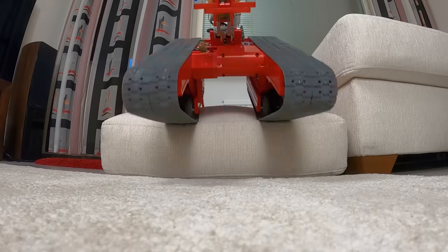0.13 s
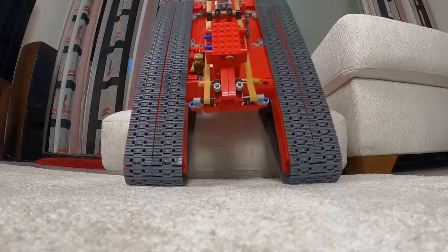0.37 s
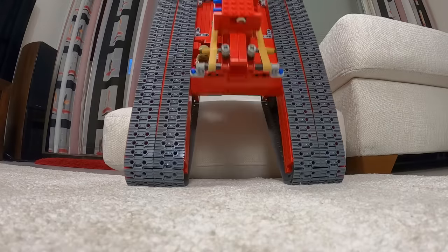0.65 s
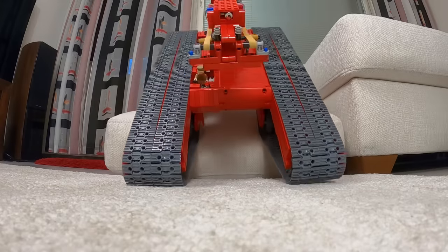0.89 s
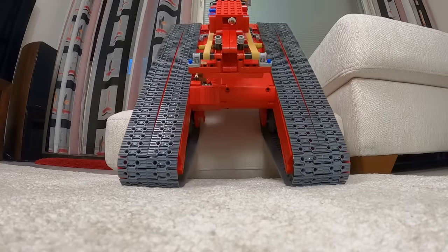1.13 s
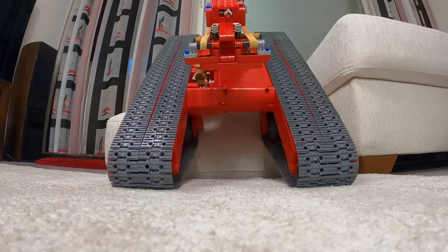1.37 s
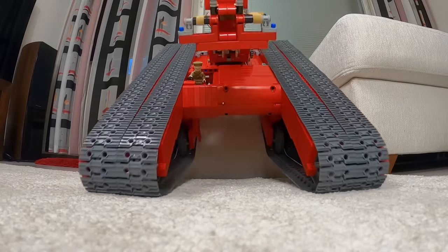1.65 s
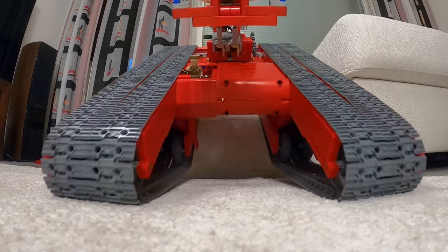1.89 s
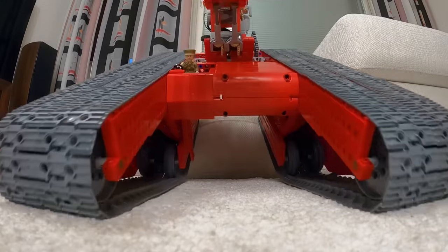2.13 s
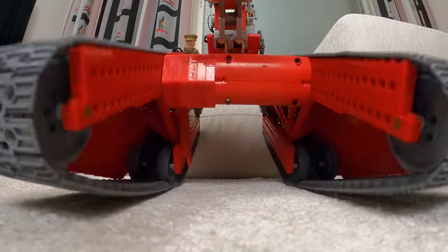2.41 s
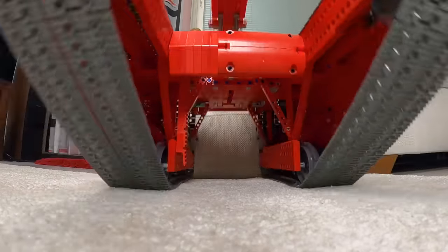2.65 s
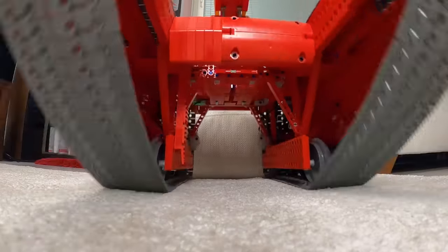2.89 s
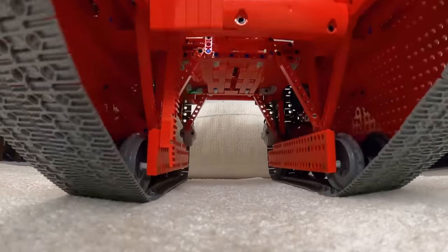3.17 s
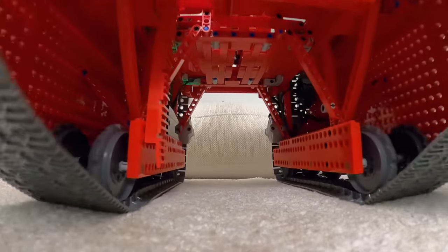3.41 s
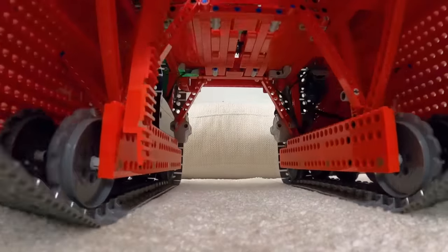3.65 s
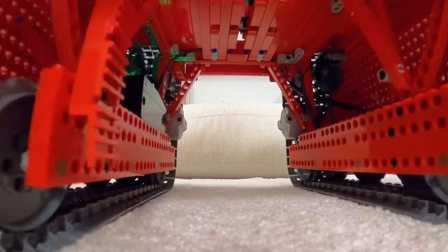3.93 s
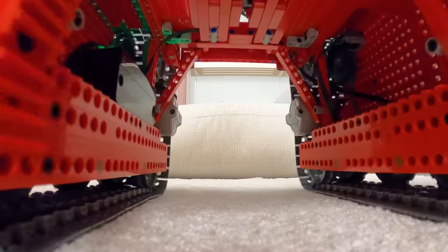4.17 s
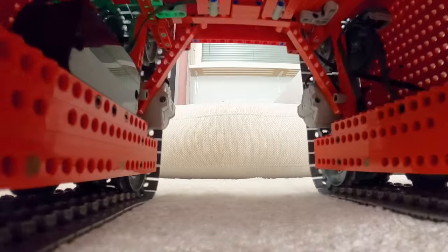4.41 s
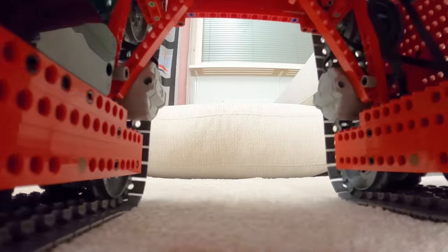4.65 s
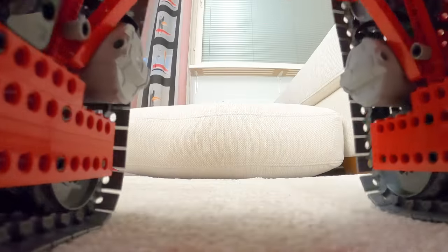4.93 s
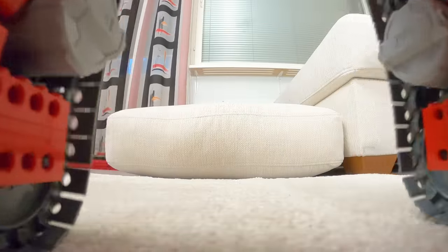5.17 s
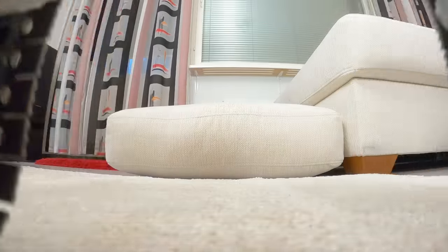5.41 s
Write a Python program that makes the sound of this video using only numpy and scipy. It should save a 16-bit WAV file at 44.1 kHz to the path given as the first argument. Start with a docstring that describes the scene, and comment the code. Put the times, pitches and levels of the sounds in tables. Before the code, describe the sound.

Loud plastic rattle and dull thuds, a near-quiet gap, then wavering electric motor whine and track hiss growing until it surrounds the listener.

```python
"""Toy tank drives over a microphone

A large plastic-brick tank tips off a cushion, lands with a rattle, rocks, then drives over a microphone on the carpet.
Two small geared motors whine at slightly different speeds: multiples of their gear rates, part tone, part noise.
Coloured noise makes the hiss of gears and track links; resonances make the frame's thuds and the brick knocks."""
import sys
import numpy as np
from scipy import signal
from scipy.fft import rfft, irfft, next_fast_len
from scipy.io import wavfile
from scipy.ndimage import uniform_filter1d, map_coordinates

SR = 44100
rng = np.random.default_rng(int(sys.argv[2]) if len(sys.argv) > 2 else 0)


def generate_wav(signal):
    """Clip the signal to [-1, 1] and save it as 16-bit WAV at the path in sys.argv[1]."""
    frames = np.transpose(np.atleast_2d(signal))
    scaled = np.clip(frames, -1, 1) * 32767
    pcm = np.round(scaled).astype(np.int16)
    wavfile.write(sys.argv[1], SR, pcm)


def field_ratio(decibels):
    """Amplitude ratio for a level in dB (20 dB per decade); scalars and array-likes work."""
    return 10 ** (np.asarray(decibels, dtype=float) / 20)


N = 244755
TIME = np.arange(N) / SR  # seconds
TEETH = 10  # gear teeth met per shaft turn
RISE_S = 0.01  # how fast the frame and floor answer a blow


def unit(x):
    """Scale to rms 1."""
    return x / np.sqrt(np.mean(x ** 2) + 1e-20)


def along(points, hz):
    """Read a curve of (Hz, value) points on a log frequency axis."""
    point_hz, value = np.transpose(points)
    return np.interp(np.log(hz + 1), np.log(point_hz + 1), value)


def curves(rows):
    """One value per sample for each column after the time."""
    s, *columns = np.transpose(rows)
    return [np.interp(TIME, s, column) for column in columns]


def wobble(rate):
    """A smooth random curve with rate knots a second."""
    knots = rng.standard_normal(int(N * rate / SR) + 4)
    return map_coordinates(knots, [np.arange(N) * rate / SR])


def bump(s, length):
    """A bell-shaped weight round a moment."""
    return np.exp(-((TIME - s) / length) ** 2)


def ages(times):
    """Seconds passed since each moment, zero before it."""
    return [np.clip(TIME - s, 0, None) for s in times]


def after(times, dbs, t60):
    """Summed power envelopes that rise quickly and die away after each moment, as amplitude."""
    power = 0
    for age, db in zip(ages(times), dbs):
        power = power + (field_ratio(db - 60 * age / t60) * (1 - np.exp(-(age / RISE_S) ** 2))) ** 2
    return np.sqrt(power)


def filtered(x, response):
    """Shape x with a complex response of frequency."""
    m = next_fast_len(N + SR // 2)
    return irfft(rfft(x, m) * response(np.fft.rfftfreq(m, 1 / SR)), m)[:N]


def resonances(modes):
    """Response of bodies that ring after a push; modes are (Hz, width Hz, dB), with alternating signs."""
    def response(f):
        total = 0
        for k, (centre, width, db) in enumerate(modes):
            ring = 1j * f * width / (centre * centre - f * f + 1j * f * width)
            total = total + (-1) ** k * field_ratio(db) * ring
        return total
    return response


def rush(spectrum, patchy_db):
    """Coloured noise of rms 1 with random patches of gain across time and pitch."""
    z = signal.stft(rng.standard_normal(N + 512), nperseg=512)[2]
    patches = uniform_filter1d(rng.standard_normal(z.shape), size=5, axis=0)
    patches = unit(uniform_filter1d(patches, size=12, axis=1))
    noise = signal.istft(z * field_ratio(patchy_db * patches), nperseg=512)[1][:N]
    return unit(filtered(noise, lambda hz: field_ratio(along(spectrum, hz))))


def bursts(times, dbs, t60, rise, spike, colour_db=0):
    """Contact noises: quick rise, exponential fall, a one-sample push of size spike; each has its own colour."""
    out, t = np.zeros(N + SR), np.arange(SR // 5) / SR
    for s, db in zip(times, dbs):
        colour = map_coordinates(rng.standard_normal(20), [np.linspace(0, 19, len(t) // 2 + 1)])
        noise = unit(irfft(rfft(rng.standard_normal(len(t))) * field_ratio(colour_db * colour), len(t)))
        start = round(s * SR)
        out[start:][:len(t)] += field_ratio(db - 60 * t / t60) * (1 - np.exp(-t / rise)) * noise
        out[start] += spike * field_ratio(db)
    return out[:N]


def orders(hz, table, rough, spread_hz):
    """Multiples of a rotation, each partly a clean line and partly a narrow band of noise round it."""
    turn = 2 * np.pi * np.cumsum(hz) / SR
    clean = np.sqrt(np.clip(1 - rough, 0, 1) * 2)
    smear = lambda: np.sqrt(rough) * wobble(spread_hz)
    total = 0
    for k, db in table:
        line = (clean + smear()) * np.sin(k * turn) + smear() * np.cos(k * turn)
        total = total + field_ratio(db) * line
    return total


# Running gear, speed and nearness together: start_s, level_db (gear hiss before it flutters)
DRIVE = [(0.0, -51.5), (0.25, -54.5), (0.33, -64), (1.11, -63.5), (1.21, -51), (1.35, -42.5), (1.55, -38.5),
         (1.8, -36.5), (2.3, -38), (2.7, -33.5), (3.1, -32.5), (3.6, -29.5), (4.0, -27), (4.5, -25),
         (5.55, -26.5)]


def approach_db(grows):
    """The hiss level in dB, with its distance below the loudest moment stretched by grows."""
    hiss_db, = curves(DRIVE)
    return hiss_db - (grows - 1) * (hiss_db.max() - hiss_db)


def voice(db):
    """Gain of a whine: whines rise faster than the hiss as the tank nears, with slow chance on top."""
    return field_ratio(db + approach_db(grows=1.67) + 1.2 * wobble(4.036))


def teeth(hz, depth):
    """Uneven teeth swell the sound once a shaft turn, which spreads side lines."""
    return 1 + depth * np.cos(2 * np.pi * np.cumsum(hz) / TEETH / SR)


def hidden():
    """Weight of the hull's shade over the right motor: 1 until it passes, then 0."""
    return 1 / (1 + np.exp(np.clip((TIME - PASS_S) / .02, -50, 50)))


PASS_S = 4.48  # the right motor comes out from behind the hull
LOW_DB = -17  # left motor's lower multiples, against the loudest hiss
# Left gear whine: multiple (of the mesh rate), level_db
LEFT_MESH = [(1, -0.5), (2, 4.5)]
# Every second tooth bites harder: multiple (of half the left mesh rate), level_db
HALF_MESH = [(5, -6.5)]


def left_motor(left_hz, strain_db, low_db, high_db):
    """Teeth meeting in the left gears whine at multiples of the mesh rate."""
    whine = voice(LOW_DB + low_db) * orders(left_hz, LEFT_MESH, rough=.4, spread_hz=140)
    high = [(3, 0), (4, -1)]  # multiple, level_db
    whine += voice(-11 + strain_db + high_db) * orders(left_hz, high, rough=.2, spread_hz=140)
    whine += voice(LOW_DB) * orders(left_hz / 2, HALF_MESH, rough=.3, spread_hz=140)
    return whine * teeth(left_hz, 0.37)


# Right gear whine: multiple (of the mesh rate), level_db
RIGHT_MESH = [(2, -9), (3, 5)]


def right_motor(right_hz, strain_db):
    """The hull hides this whine until it passes, but for one clear glimpse; then it draws away."""
    glimpse = bump(2.95, .1)
    leave_db = -5 * np.clip(TIME - PASS_S, 0, None)  # 5 dB a second
    gain = voice(-8.5) * field_ratio(leave_db)
    shade_db = -12 * hidden() * (1 - glimpse) + 4 * glimpse
    tone = orders(right_hz, RIGHT_MESH, rough=.72 - glimpse / 2, spread_hz=200)
    # tooth rattle: a broad band round the strongest multiple
    rattle = orders(right_hz, [(3, -2.4)], rough=0.97, spread_hz=750)
    return gain * (field_ratio(shade_db + strain_db / 2) * tone + rattle) * teeth(right_hz, 0.12)


# Shaft hum: multiple (of the right shaft rate), level_db
SHAFT = [(1, -5), (3, -7), (7, -11)]


def shaft_hum(right_hz):
    """The right shaft hums at multiples of its turning rate; the hum carries only a short way."""
    gain_db = -9 + approach_db(grows=1.57) - 1 * hidden() + 2 * wobble(4)
    return field_ratio(gain_db) * orders(right_hz / TEETH, SHAFT, rough=.18, spread_hz=25)


# A rise and fall in pitch: multiple (of the arching pitch), level_db
ARCH = [(3, 1), (5, 6)]


def arching_whine():
    """A short breathy whine that rises and falls."""
    shape = bump(4.4, 0.12)
    pitch_hz = 1753 - 38.6 * (1 - shape)
    return field_ratio(-38) * shape * orders(pitch_hz, ARCH, rough=1, spread_hz=450)


# Speeds sag under load and recover:
# start_s, left_pitch_hz (gear mesh), right_pitch_hz (gear mesh), fuzzy_pitch_hz (centre of a treble whine)
SPEED = [(1.4, 1570, 1600, 6330), (1.8, 1610, 1673, 6700), (2.44, 1635, 1595, 6470),
         (2.55, 1570, 1681, 7030), (2.73, 1635, 1718, 7460), (2.8, 1620, 1615, 6480),
         (2.9, 1492, 1572, 6150), (2.96, 1475, 1560, 5900), (3.05, 1500, 1555, 6070),
         (3.12, 1625, 1700, 7120), (3.28, 1670, 1658, 6720), (3.35, 1590, 1617, 6460),
         (3.45, 1564, 1617, 6500), (3.56, 1665, 1657, 6700), (3.72, 1605, 1673, 6960),
         (4.0, 1622, 1680, 6800), (4.4, 1622, 1686, 6720), (5.12, 1614, 1684, 6680),
         (5.55, 1619, 1672, 6520)]
# Moments where a voice swells or is shaded by the hull:
# centre_s, length_s, low_db (left multiples 1 and 2), high_db (left multiples 3 and 4), fuzzy_db
SWELLS = [(1.9, 0.6, 3, -18, -14), (2.66, 0.2, 9, 3, 4), (2.77, .08, 2, 0, 11), (2.95, 0.12, -6, 9, 0),
          (3.15, 0.09, 6, 6, 10), (3.38, 0.08, 4, 9, 6), (3.63, 0.089, 0.5, 4, -12),
          (3.952, 0.18, 2, 0, -7), (4.203, 0.11, 2.5, -5, 6.5), (4.517, 0.14, -5, -4, -17),
          (5.1, 0.3, 2, -7, 1)]


def motors():
    """Two geared motors whine as their loads change, with a fuzzy treble whine pulsed by the right shaft."""
    left_hz, right_hz, fuzzy_hz = curves(SPEED)
    moments = [bump(*row[:2]) for row in SWELLS]
    low_db, high_db, fuzzy_db = np.transpose(SWELLS)[2:] @ moments
    # the slower the left motor runs below 1540 Hz, the clearer the higher multiples: 0.02 dB per Hz
    strain_db = 0.02 * np.clip(1540 - left_hz, 0, None)
    left_hz = left_hz * (1 + .0015 * wobble(25))
    right_hz = right_hz * (1 + .002 * wobble(25))
    fuzzy = voice(-10.5 + fuzzy_db) * orders(fuzzy_hz, [(1, 0)], rough=.95, spread_hz=380)
    fuzzy *= teeth(right_hz, 1.6)
    left = left_motor(left_hz, strain_db, low_db, high_db)
    right = right_motor(right_hz, strain_db)
    return left + right + shaft_hum(right_hz) + fuzzy + arching_whine()


# Tone colour of the track growl: pitch_hz, level_db (relative)
GROWL = [(350, -14.5), (520, -0.5), (720, -6.5), (1000, 0.5), (1200, -1), (1500, 2.5), (2000, -4),
         (2500, -11.5), (3500, -16), (6000, -70)]
# Tone colour of the hiss from across the carpet: pitch_hz, level_db (relative)
FAR = [(1350, -47.5), (2300, -13.5), (3800, 7), (5230, 4.5), (8450, -7.5), (9680, -21), (11200, -22),
       (15500, -44)]
# Tone colour of the hiss from overhead: pitch_hz, level_db (relative)
NEAR = [(1350, -23.5), (2500, -10), (3600, -7), (4950, -3.5), (5600, -5.5), (6650, -3), (7900, -8.5),
        (8700, -7.5), (9500, -17.5), (10300, -14), (12100, -23), (15500, -38.5)]


def running_gear():
    """Track links growl and clack, gears hiss in a nearer colour as they close in; both flutter at random."""
    hiss_db, = curves(DRIVE)
    landing_s = 0.424
    # loose parts rattle on after the landing
    rattle = field_ratio(-38.5) * bump(landing_s, 0.18) * (TIME > landing_s)
    idle = field_ratio(-62)  # faint creaking of the tracks at rest
    # growl falls behind the hiss on either side of -37.5 dB
    growl_gain = field_ratio(hiss_db + 0.5 - 0.54 * np.abs(hiss_db + 37.5)) + rattle + idle
    links = wobble(45)
    clacks = (rng.random(N) < 60 / SR) * field_ratio(rng.exponential(size=N))  # about 60 link slaps a second
    clacks = field_ratio(-11) * unit(filtered(clacks, hollow))
    growl = growl_gain * (field_ratio(.5 * links + wobble(150)) * rush(GROWL, patchy_db=2.3) + clacks)
    near = np.clip((hiss_db + 41.0) / 9, 0, 1)  # the louder, the nearer
    hiss = np.sqrt(1 - near) * rush(FAR, patchy_db=1.2) + np.sqrt(near) * rush(NEAR, patchy_db=1.2)
    hiss_gain = (field_ratio(hiss_db) + field_ratio(-16) * rattle) * field_ratio(0.72 * links + 0.53 * wobble(160))
    # a rasp as the rear wheels pass
    rasp = rush([(1500, -30), (2040, 0), (2900, -30), (3500, -90)], patchy_db=1.5)
    return growl + field_ratio(-36.5) * bump(5.46, 0.65) * rasp + hiss_gain * hiss


# Frame blows: start_s, level_db (peak), floor_level_db (floor-borne rumble, before its gains)
THUDS = [(0.411, -37, -62), (0.443, -13, -23), (.468, -20, -27.5), (0.845, -36, -53), (0.896, -33, -62),
         (0.918, -30, -62), (0.984, -26, -50), (1.011, -23.5, -37), (1.031, -25, -37), (1.134, -20, -31.5),
         (1.572, -33, -38), (2.062, -26, -55), (2.132, -20.5, -56), (2.216, -16.5, -36),
         (2.289, -19, -25.5), (2.311, -17.5, -30), (2.334, -26, -31.5), (3.501, -31.5, -40)]
# Deep thumps as the nose settles near the microphone: centre_s, level_db
THUMPS = [(3.04, -45), (3.125, -40)]
# Steady shaking from the running tracks: start_s, level_db (shudder before it wavers)
SHAKE = [(0.0, -59), (.3, -51.5), (.8, -58), (1.4, -45.5), (1.65, -37), (2.3, -41), (2.55, -50.5),
         (2.95, -47.5), (3.5, -41.5), (4.3, -33), (5.55, -41)]


def floor():
    """The floor carries a low noisy rumble, a 57 Hz thump under each blow and two deep thumps."""
    (shake_db,), (hiss_db,) = curves(SHAKE), curves(DRIVE)
    times, _, floor_db = np.transpose(THUDS)
    t60_s = .25
    beside = np.clip((hiss_db + 30.5) / 1.2, 0, 1)  # 1 once the tracks pass beside the microphone
    rumble = np.hypot(field_ratio(shake_db - 29.5 + 21 * beside), after(times, floor_db + 2.5, t60_s))
    rumble *= rush([(12, -44), (42, 0.5), (95, -2), (140, -1.5), (400, -92.0)], patchy_db=2.0)
    for age, db in zip(ages(times), floor_db):
        envelope = field_ratio(db - 60 * age / t60_s) * (1 - np.exp(-age / RISE_S))
        rumble += envelope * np.sin(2 * np.pi * 57.2 * age)
    for s, db in THUMPS:
        rumble += field_ratio(db) * bump(s, 0.027) * np.sin(2 * np.pi * 30 * (TIME - s))
    return rumble


# What the shaking rings: pitch_hz, width_hz, level_db (relative)
TRACKS = [(154, 42.4, -0.5), (218, 78, 0), (341, 74, -3), (491, 115, -9.5)]
# What a blow rings: pitch_hz, width_hz, level_db (relative)
FRAME = [(159, 21, 2.5), (253, 46.5, 2), (332, 38, 3), (483, 100, -6.5), (1045, 157, -17.5)]


def frame():
    """The frame rings low under single blows, which leave a noisy shudder, and under steady shaking."""
    shake_db, = curves(SHAKE)
    times, blow_db, _ = np.transpose(THUDS)
    no_bass = lambda hz: hz ** 6 / (hz ** 6 + 120 ** 6)
    struck = lambda hz: resonances(FRAME)(hz) * no_bass(hz)
    shaken = lambda hz: resonances(TRACKS)(hz) * no_bass(hz)
    shudder = after(times, blow_db - 3.5, t60=.28) * unit(filtered(rng.standard_normal(N), struck))
    shudder += field_ratio(shake_db) * unit(filtered(rng.standard_normal(N), shaken))
    shudder *= field_ratio(1.26 * wobble(40))
    blows = np.zeros(N)
    blows[np.round(times * SR).astype(int)] = field_ratio(blow_db)
    ring_peak = np.abs(filtered(np.arange(N) == SR, struck)).max()  # peak after one unit blow
    return shudder + filtered(blows, struck) / ring_peak


# Brick cavities: pitch_hz, width_hz, level_db
HOLLOW = [(775, 1100, 6), (1036, 356, 10), (1360, 250, 5), (2350, 180, 1)]


def hollow(hz):
    """Brick cavities under a blunt contact that loses the treble."""
    return resonances(HOLLOW)(hz) / (1 + 1j * hz / 3500) ** 2


# Plastic parts clicking: start_s, level_db (snap before colouring), knock_db (hollow knock against the snap)
CLICKS = [(0.369, -42, -20), (0.427, -10.5, -11.5), (0.4347, -21.5, 6), (0.4464, -15.5, 1.5),
          (0.4764, -19.5, -11), (0.512, -8.5, -17), (0.5465, -20.5, 4.5), (0.5703, -23.5, -5),
          (0.589, -26, 0), (0.607, -26, -22), (.619, -38.5, 10), (0.652, -26, -19), (0.678, -29, -12),
          (.711, -39, -20), (0.7357, -23.5, -16), (.774, -40.5, 3.5), (0.847, -34, -30), (0.8684, -29, -5),
          (0.92, -31.5, 2), (0.976, -31.5, -5), (3.5028, -19, 7.5), (3.5112, -20.5, 8), (3.5227, -23.5, 4)]
# Tone colour of the snap: pitch_hz, level_db
SNAP = [(880, -3), (1500, 1), (2750, -1), (3380, 2.5), (8130, -2.5), (15500, -27)]


def clicks():
    """Each contact is a bright snap plus a hollow knock."""
    s, db, knock_db = np.transpose(CLICKS)
    snap = bursts(s, db, t60=0.027, rise=0.0017, spike=0, colour_db=3)
    knock = bursts(s, db + knock_db, t60=.03, rise=.0015, spike=9, colour_db=4)
    return filtered(snap, lambda hz: field_ratio(along(SNAP, hz))) + filtered(knock, hollow)


def knocks():
    """One stiff track link knocks at every pass of a sprocket tooth, loudest about when it is overhead."""
    s = 3.717 + .075 * np.arange(16)  # 16 knocks, 75 ms apart
    nearness_db = -10 * ((s - 4.42) / .45) ** 2
    db = 15.5 - 20 + nearness_db + 2 * rng.standard_normal(len(s))
    return filtered(bursts(s, db, t60=.01, rise=.001, spike=10), resonances([(1100, 300, 0)]))


# Speed controller chopping the current at part throttle:
# start_s, end_s, low_level_db (at the chop rate, before flutter), high_level_db (at twice the rate, same)
CHOP = [(1.02, 1.32, -47, -63)]


def controller():
    """The chopped current makes the slow windings sing; the commutator splits the lower tone as the rotor speeds up."""
    hiss_db, = curves(DRIVE)
    low = high = 0
    for start, end, low_db, high_db in CHOP:
        gate = (TIME > start) * field_ratio(-320 * np.clip(TIME - end, 0, 1))  # dies by 320 dB a second
        # starts 10 dB down and is fullest 0.19 s later
        swell_db = -10 * np.clip(np.abs(1 - ((TIME - start) / .19) ** 2), 0, 1)
        low = low + field_ratio(low_db + swell_db) * gate
        high = high + field_ratio(high_db) * gate
    turn = 2 * np.pi * 3967 * TIME  # chop rate 3967 Hz
    commutator_hz = 7 * (hiss_db - hiss_db.min())  # the hiss level stands in for rotor speed
    split = 2 * np.pi * np.cumsum(commutator_hz * (1 + .05 * wobble(30))) / SR
    tone = .4 * np.sin(turn) + .7 * np.sin(turn - split) + .35 * np.sin(turn + split)
    return low * field_ratio(1.5 * wobble(90)) * tone + high * field_ratio(wobble(40)) * np.sin(2 * turn)


# How long the room's answer takes to fall by 60 dB: pitch_hz, decay_s
ROOM = [(200, 0.05), (2000, 0.4), (10000, 0.17)]


def room(x):
    """Each frequency of the soft room's answer dies at its own speed."""
    hz, t, z = signal.stft(rng.standard_normal(SR // 2), SR, nperseg=256)
    tail = signal.istft(z * field_ratio(-60 * t / along(ROOM, hz)[:, None]), SR, nperseg=256)[1]
    delayed = np.pad(x, (200, 0))  # the answer comes 200 samples late
    return signal.fftconvolve(delayed, tail / np.linalg.norm(tail))[:N]


def scene():
    """The tank on the carpet; only the clicks are heard in the room."""
    hits = clicks()
    contacts = hits + field_ratio(-7.0) * room(hits) + knocks()
    return (motors() + running_gear() + frame() + floor() + contacts + controller())[None]


def band_limit(x):
    """A steep low-pass at the top of the band."""
    return signal.sosfilt(signal.butter(12, 15670, fs=SR, output="sos"), x)


def record(dry):
    """The treble stops at 15670 Hz and the last 27 ms fade to a quarter."""
    fade = np.clip((N - np.arange(N)) / (0.027 * SR), .25, 1)
    mix = filtered(dry[0], lambda hz: hz < 15670)[None] * fade
    return band_limit(mix)


dry = scene()
out = record(dry)
generate_wav(out)
```